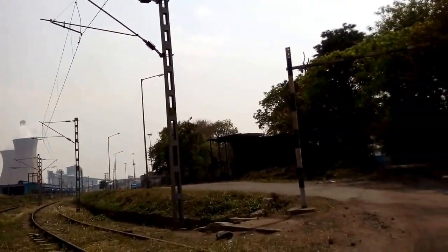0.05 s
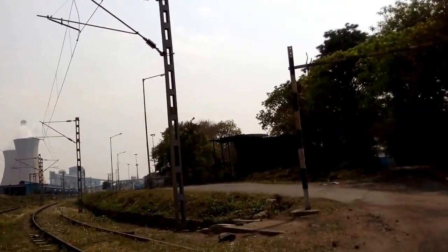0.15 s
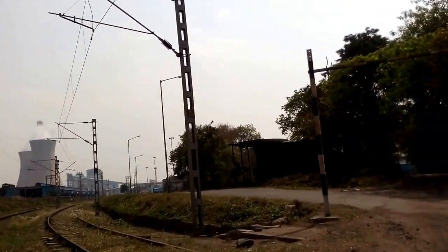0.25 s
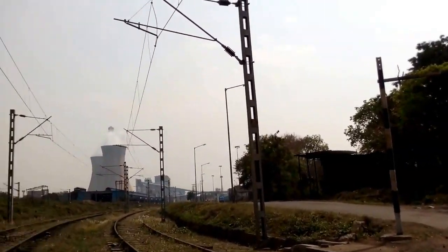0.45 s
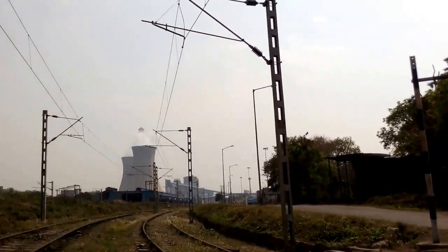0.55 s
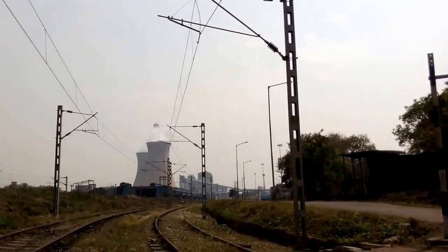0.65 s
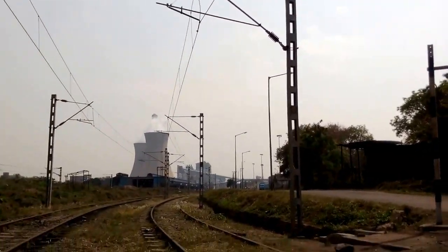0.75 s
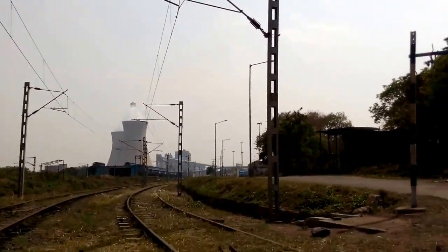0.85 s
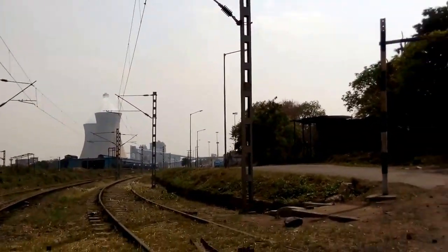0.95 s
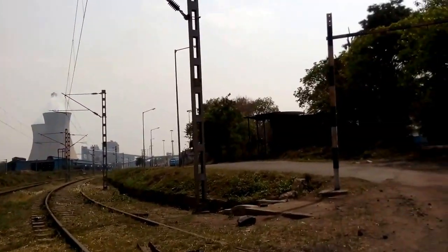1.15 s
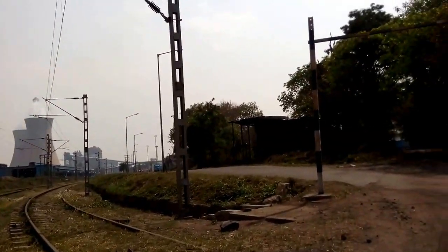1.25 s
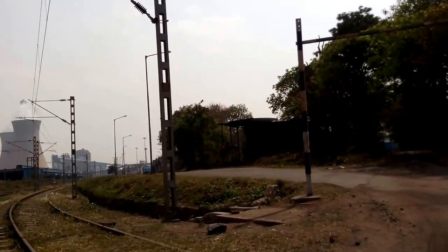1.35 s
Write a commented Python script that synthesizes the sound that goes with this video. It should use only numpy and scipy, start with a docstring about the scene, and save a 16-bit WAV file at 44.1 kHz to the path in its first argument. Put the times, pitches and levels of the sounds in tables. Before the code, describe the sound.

Wind rumbles on a hand-held microphone outdoors in uneven puffs, then hits it with two hard thumps. Fingers tick and rub on the casing and shoes faintly scuff gravel, over a very faint distant industrial hum.

```python
"""Wind buffets the microphone of a small hand-held camera, twice with a hard thump.
Swirls of air push on the microphone's opening and make it rumble. Fingers tick and rub
on the casing, a sleeve rustles, and shoes scuff the gravel as someone turns on the spot.
Behind it all, a distant industrial plant hums and the open air hisses faintly."""
import sys
import numpy as np
from scipy import signal
from scipy.fft import rfft, irfft
from scipy.io import wavfile
from scipy.ndimage import uniform_filter1d

SR = 44100
rng = np.random.default_rng(int(sys.argv[2]) if len(sys.argv) > 2 else 0)


def digitize_waveform(pressure):
    """Quantize a signal to 16-bit integers and store it at the path in sys.argv[1].

    Rows of a 2-D input are taken as channels; values are limited to [-1, 1].
    """
    field = np.atleast_2d(pressure).T
    bounded = np.clip(field, -1, 1)
    quanta = np.round(bounded * 32767).astype(np.int16)
    wavfile.write(sys.argv[1], SR, quanta)


N = 61739
TIME = np.arange(N) / SR
FREQS_HZ = np.maximum(np.arange(N // 2 + 1) * SR / N, 1)


def from_db(db):
    """Turn decibels into a number to multiply a sound by."""
    return 10 ** (np.asarray(db) / 20)


def rms_one(x):
    """Scale a sound so that its average strength (rms) is 1."""
    return x / np.sqrt(np.mean(x ** 2) + 1e-20)


def colour(x, spectrum):
    """Shape a sound with a spectrum, a list of how strong each frequency is; the result has rms 1."""
    hz, db = np.transpose(spectrum)
    gain = from_db(np.interp(np.log(FREQS_HZ), np.log(hz), db))
    edge_fade = np.minimum(1, np.minimum(FREQS_HZ / hz[0], hz[-1] / FREQS_HZ)) ** 2
    return rms_one(irfft(rfft(x) * edge_fade * gain, N))


def noise(spectrum):
    """A smooth rushing sound with this spectrum."""
    return colour(rng.standard_normal(N), spectrum)


def grains(per_s, spread_db):
    """Tiny clicks of uneven size at random moments."""
    sizes = from_db(spread_db * np.minimum(rng.exponential(1, N), 4))
    return sizes * rng.choice([-1, 1], N) * (rng.random(N) < per_s / SR)


def strokes(rows, attack_s, release_s):
    """A loudness curve: each stroke rises (attack), holds, then dies away (release)."""
    power = 0
    for start, length, db in rows:
        rise = np.clip((TIME - start) / attack_s, 0, 1)
        fall = np.exp(-np.maximum(TIME - start - length, 0) / release_s)
        power = power + (from_db(db) * rise * fall) ** 2
    return np.sqrt(power)


def blended_strokes(rows, dull, bright, attack_s, release_s):
    """Strokes that each mix a dull sound (brightness 0) with a bright one (brightness 1)."""
    out = 0
    for start, length, db, brightness in rows:
        mix = np.sqrt(1 - brightness) * dull + np.sqrt(brightness) * bright
        out = out + strokes([(start, length, db)], attack_s, release_s) * mix
    return out


def ring(x, hz, t60_s):
    """Let a sound ring at one pitch; the ringing fades by 60 dB in t60_s seconds."""
    decay = np.exp(-np.log(1000) / (t60_s * SR))
    angle = 2 * np.pi * hz / SR
    return signal.lfilter([0, np.sin(angle)], [1, -2 * decay * np.cos(angle), decay ** 2], x + 1e-18)


def knock(spectrum):
    """The shortest click that has this spectrum, scaled to a peak of 1."""
    hz, db = np.transpose(spectrum)
    gain = from_db(np.interp(np.log(FREQS_HZ), np.log(hz), db))
    cepstrum = irfft(np.log(gain), N)
    cepstrum[N // 2:] = 0  # packs the click's energy at its start
    click = irfft(np.exp(rfft(2 * cepstrum)), N)
    return click / np.abs(click).max()


# Spectra of the far-off wash and the thin hiss: f/Hz, relative level/dB
WASH_SPECTRUM = [(25, 7.5), (120, 8), (300, -0.5), (550, -3.5), (900, 2.5), (1350, -2.5), (1950, -3),
                 (2400, -15), (3300, -20.5), (5000, -18.5)]
HISS_SPECTRUM = [(4000, -25), (5800, -14.5), (6500, -6.5), (8100, -0.5), (9050, -8.5), (9550, -29),
                 (12000, -23), (15500, -23)]
# Tones of the distant plant: f/Hz, level/dB
HUM_TONES = [(593, -65.5), (820, -67.5), (1879, -66)]
def background():
    """A distant plant hums with wavering tones over the soft wash and hiss of the open air."""
    hum = sum(from_db(db) * rms_one(ring(rng.standard_normal(N), hz, t60_s=0.15)) for hz, db in HUM_TONES)
    return hum + from_db(-53) * noise(WASH_SPECTRUM) + from_db(-62) * noise(HISS_SPECTRUM)


# Spectra of the crackling grit and the scraping sole: f/Hz, relative level/dB
GRIT_SPECTRUM = [(2000, -18), (3200, -35), (4500, -13), (5300, -3.5), (6000, -2), (7200, 0.5), (8600, -8),
                 (10000, -15.5), (12000, -27.5), (15500, -45)]
SOLE_SPECTRUM = [(220, -15), (450, 1), (650, 5.5), (1000, -5.5), (1600, 2.5), (2100, 0), (2800, -11),
                 (4000, -17), (8000, -41)]
# Shoe scuffs: start t/s, length/s, grit level/dB, sole level/dB
SHOE_SCUFFS = [(0.242, 0.028, -51.5, -52), (0.269, 0.013, -50.5, -45.5), (0.288, .02, -46, -46.5),
               (0.315, 0.12, -54.5, -58), (0.354, 0.018, -57, -49.5), (0.374, 0.01, -42, -45.5),
               (0.641, .008, -54, -50.5), (.843, 0.03, -43, -47.5), (0.88, 0.034, -48.5, -56),
               (0.919, 0.099, -53, -53)]
def shoes():
    """Grit crackles under a shoe, and the same tiny impacts give the sole a duller scrape."""
    fades = dict(attack_s=0.01, release_s=0.0085)
    grit = strokes([(start, length, db) for start, length, db, _ in SHOE_SCUFFS], **fades)
    sole = strokes([(start, length, db) for start, length, _, db in SHOE_SCUFFS], **fades)
    stones = grains(per_s=2800, spread_db=1.5)
    return grit * colour(stones, GRIT_SPECTRUM) + sole * colour(stones, SOLE_SPECTRUM)


def friction(spectrum):
    """Sliding skin or cloth catches and slips thousands of times a second."""
    return colour(grains(per_s=12000, spread_db=3.5), spectrum)


# Spectrum of sliding cloth: f/Hz, relative level/dB
CLOTH_SPECTRUM = [(1000, -6), (2000, -0.5), (2800, -0.5), (4200, 2.5), (5500, 4), (8000, 5.5), (10500, -5),
                  (12500, -16), (15500, -22)]
# Sleeve movements: start t/s, length/s, level/dB
SLEEVE_RUSTLES = [(-.01, 0.04, -51.5), (.055, 0.011, -54.5), (.082, 0.026, -50.5), (.79, 0.022, -55),
                  (1.185, 0.012, -56), (1.325, 0.071, -56)]
def sleeve():
    """Cloth slides in short rustles that start quickly and trail off."""
    return strokes(SLEEVE_RUSTLES, attack_s=0.0033, release_s=0.034) * friction(CLOTH_SPECTRUM)


# Spectra of a light touch and a firm one: f/Hz, relative level/dB
LIGHT_RUB_SPECTRUM = [(2600, -23), (3800, -15.5), (4600, -5), (5300, -1), (6200, -12), (7300, -28),
                      (8400, -16), (10000, -26.5), (15500, -39)]
FIRM_RUB_SPECTRUM = [(400, -29), (900, -6.5), (1800, -14), (2600, -15.5), (3600, -12), (4500, -3),
                     (5100, -0.5), (6200, -3.5), (7300, -7.5), (8400, -2), (10000, -9), (11400, -13.5),
                     (12800, -28), (15500, -31)]
# Finger slides: start t/s, length/s, level/dB, brightness from 0 to 1
FINGER_RUBS = [(0.462, 0.027, -62.5, .02), (0.483, 0.023, -49.5, 0.28), (.672, 0.036, -41.5, 0.47),
               (.712, 0.052, -39.5, 0.69), (0.766, 0.027, -46.5, 1), (.984, 0.046, -42.5, 0.82),
               (1.032, 0.013, -51.5, 0.5), (1.068, 0.028, -53, 0.27)]
def finger_rubs():
    """Fingers slide on the casing; a firmer finger sounds brighter."""
    light, firm = friction(LIGHT_RUB_SPECTRUM), friction(FIRM_RUB_SPECTRUM)
    return blended_strokes(FINGER_RUBS, light, firm, attack_s=0.0034, release_s=0.007)


# Spectrum of the casing when tapped: f/Hz, relative level/dB
CASING_SPECTRUM = [(200, -9), (800, -3.5), (1200, -8.5), (1500, -19.5), (1900, -10), (2350, -34),
                   (3100, -12.5), (4000, -9.5), (4850, 4), (5700, 0), (6700, -1), (7450, -20), (8350, -1),
                   (9200, -14.5), (10000, -10.5), (11000, -28), (11700, -15), (12700, -33.5),
                   (15500, -32.5)]
# Finger taps: t/s, snap level/dB, ring f/Hz, ring level/dB, time for the ring to fade by 60 dB/s
FINGER_TICKS = [(0.031, -38.5, 8200, -50, 0.0063), (.336, -32, 5060, -51, 0.0082),
                (.485, -28, 4210, -33.5, 0.011), (0.672, -12.5, 5050, -12, 0.0039),
                (.9823, -19, 4920, -26, 0.0043), (0.9927, -37, 3320, -31, 0.0046),
                (1.1720, -36, 4380, -40, 0.02)]
def finger_ticks():
    """Each sharp touch makes the casing snap, then ring briefly."""
    out = np.zeros(N)
    snap = knock(CASING_SPECTRUM)
    rise = 1 - np.exp(-(TIME / 0.00045) ** 2)  # the ring builds in about half a millisecond
    for start_s, snap_db, hz, ring_db, t60_s in FINGER_TICKS:
        fall = np.exp(-np.log(1000) * TIME / t60_s)
        tone = np.sin(2 * np.pi * hz * TIME) * rise * fall
        tick = from_db(snap_db) * snap + from_db(ring_db) * tone
        start = int(start_s * SR)
        out[start:] += tick[:N - start]
    return out


def turbulence(spectrum):
    """The low rumble of swirling air, held at an even strength."""
    swirl = noise(spectrum)
    local_power = uniform_filter1d(swirl ** 2, size=900)  # averaged over about 20 ms
    return swirl / np.sqrt(local_power + 1e-6)


# Spectra of slow and fast swirls of air: f/Hz, relative level/dB
SLOW_SWIRL_SPECTRUM = [(20, -48), (45, -15), (75, 0), (115, 2.5), (170, -10), (260, -17), (400, -25.5),
                       (800, -49)]
FAST_SWIRL_SPECTRUM = [(20, -20), (50, -21), (80, 2), (160, 4), (240, -5), (330, -15.5), (480, -24.5),
                       (700, -42), (1200, -60)]
# Rise and fall of the breeze: t/s, level/dB
BREEZE_CURVE = [(0, -53.5), (.09, -70), (.13, -45), (.17, -51), (.21, -43), (.29, -40), (.335, -46),
                (.48, -38), (.565, -48), (.635, -42.5), (.73, -39.5), (.81, -45.5), (.9, -38.5),
                (.965, -55.5), (1.04, -23.5), (1.16, -40.5), (1.195, -51), (1.31, -63), (1.4, -46)]
# Separate puffs: start t/s, length/s, level/dB, brightness from 0 to 1
WIND_PUFFS = [(.218, 0.029, -31.5, 0.02), (.246, 0.019, -35, 0.54), (.376, 0.033, -27.5, 0.62),
              (.412, 0.05, -26.5, .85), (.866, .014, -28.5, 0.2), (1.024, 0.025, -28, 0.53),
              (1.056, 0.04, -22, 1), (1.11, 0.045, -36.5, 0.97)]
def wind():
    """A breeze rumbles on the microphone's opening; puffs that swirl faster sound brighter."""
    slow, fast = turbulence(SLOW_SWIRL_SPECTRUM), turbulence(FAST_SWIRL_SPECTRUM)
    puffs = blended_strokes(WIND_PUFFS, slow, fast, attack_s=0.012, release_s=0.0066)
    breeze_db = np.interp(TIME, *np.transpose(BREEZE_CURVE))
    return puffs + from_db(breeze_db) * turbulence(SLOW_SWIRL_SPECTRUM)


# Swirls that hit the microphone: t/s, level/dB before the bass leaks away, width/s
WIND_THUMPS = [(1.0507, -5.5, 0.00071), (1.0898, -7, 0.00083)]
def wind_thumps():
    """Each swirl is a brief drop in air pressure; the opening leaks away its deepest bass."""
    drops = np.zeros(N)
    for centre_s, db, width_s in WIND_THUMPS:
        drops -= from_db(db) * np.exp(-0.5 * ((TIME - centre_s) / width_s) ** 2)
    bass_leak = signal.butter(1, 50, "high", fs=SR, output="sos")  # weakens sound below 50 Hz
    return signal.sosfiltfilt(bass_leak, drops)


def scene():
    """Add up all the sounds at one microphone."""
    mix = wind() + wind_thumps() + shoes() + finger_rubs() + sleeve() + finger_ticks() + background()
    return mix[None, :]


def record(dry):
    """Cut away the highest treble, above 15700 Hz."""
    treble_cut = signal.ellip(10, 0.2, 80, 15700, fs=SR, output="sos")
    return signal.sosfilt(treble_cut, dry)


dry = scene()
out = record(dry)
digitize_waveform(out)
```